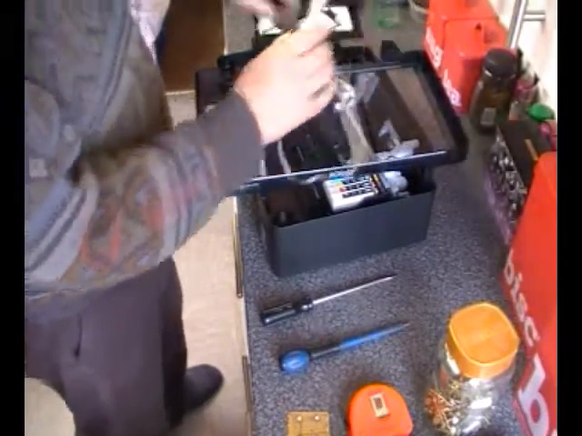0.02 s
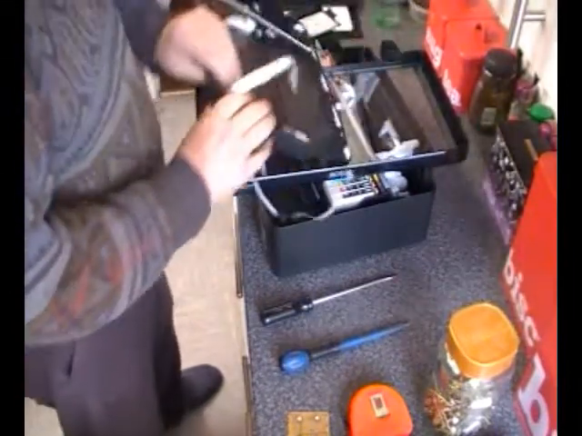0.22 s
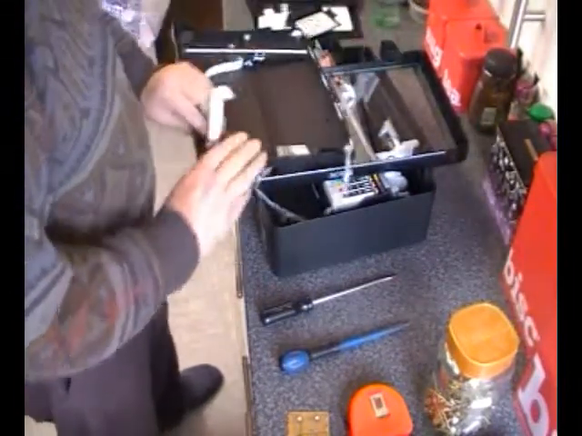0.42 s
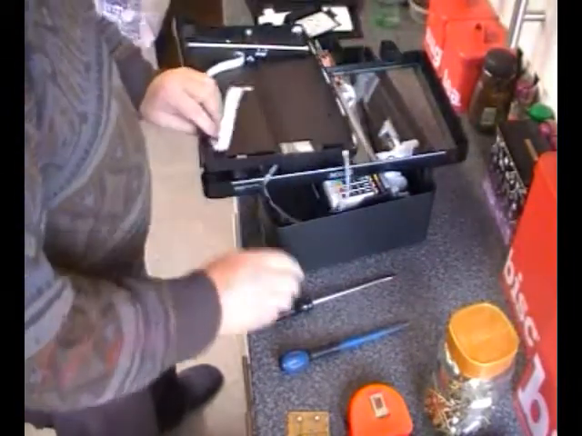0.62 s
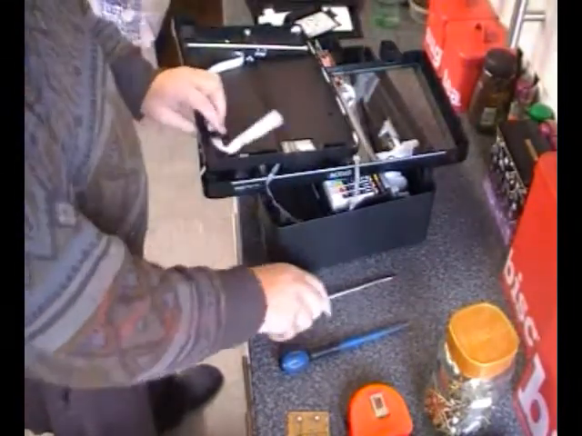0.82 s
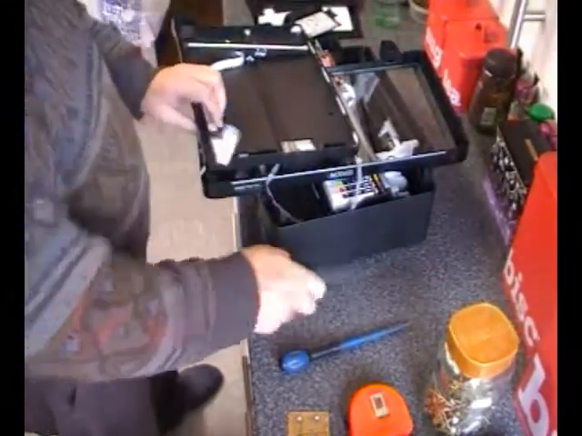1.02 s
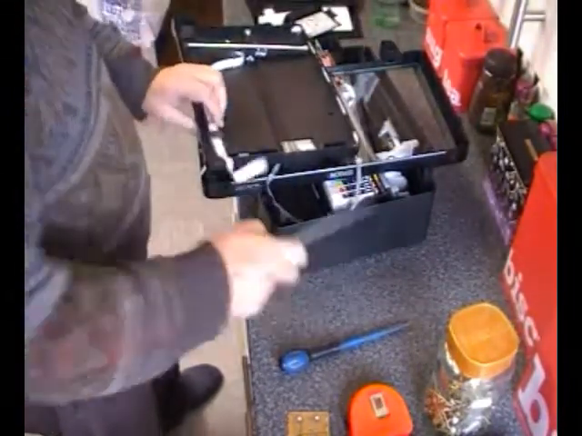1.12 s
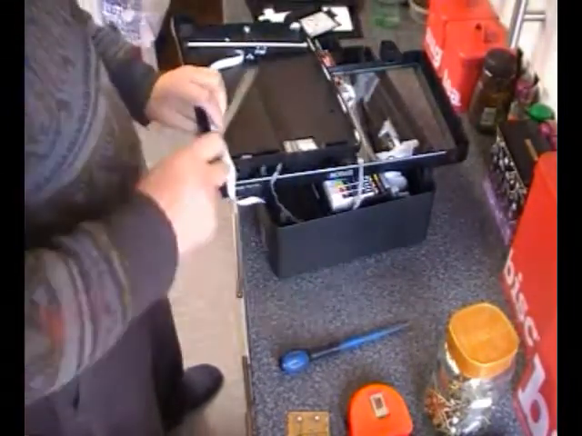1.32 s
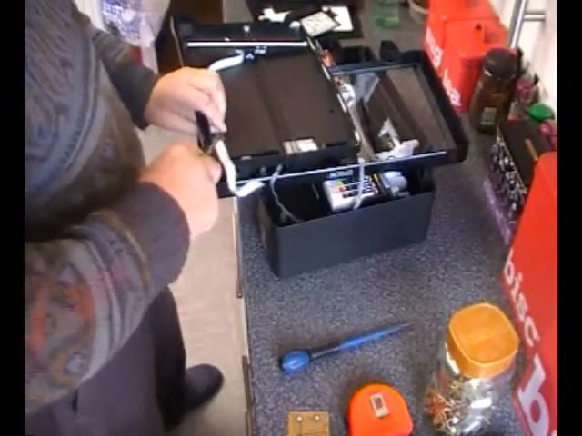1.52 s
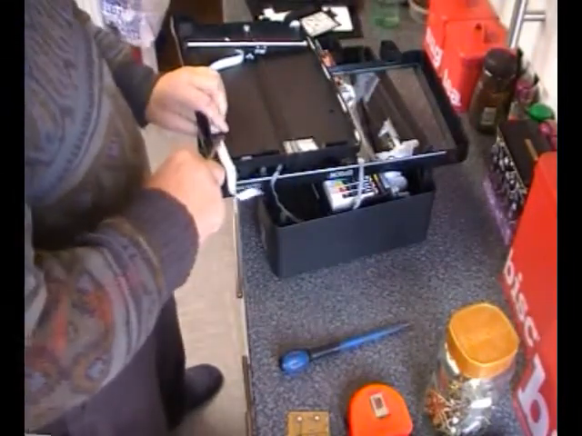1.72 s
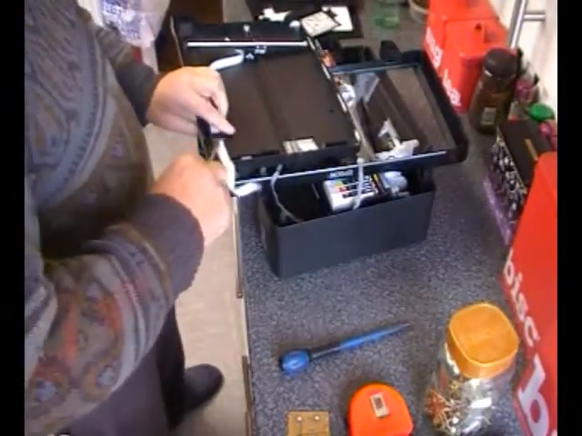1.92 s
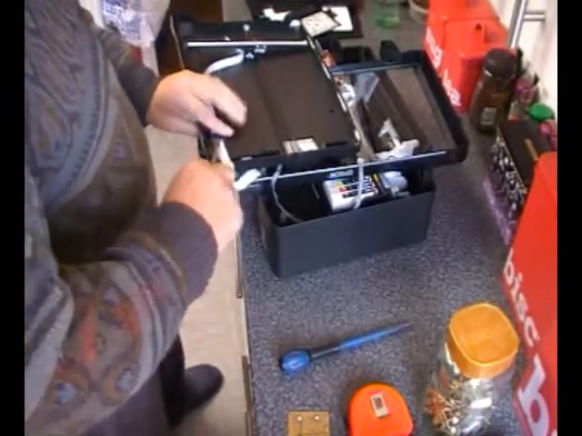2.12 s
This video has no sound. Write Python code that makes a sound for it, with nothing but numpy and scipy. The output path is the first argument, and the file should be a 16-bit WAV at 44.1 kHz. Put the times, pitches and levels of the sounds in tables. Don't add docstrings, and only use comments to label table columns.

```python
import sys
import numpy as np
from scipy import signal
from scipy.fft import rfft, irfft
from scipy.io import wavfile
from scipy.ndimage import uniform_filter1d

SR = 44100
rng = np.random.default_rng(int(sys.argv[2]) if len(sys.argv) > 2 else 0)


def pcm_store(signal):
    levels = np.round(np.clip(np.atleast_2d(signal), -1, 1) * 32767)
    wavfile.write(sys.argv[1], SR, levels.astype(np.int16).T)


def voltage_ratio(decibels):
    exponent = np.asarray(decibels, float) / 20
    return 10 ** exponent


N = 94815

# start in seconds, middle level in dB, low level in dB, high level in dB, contact length in seconds.
CABLE_TICKS = [(.001, -11.5, -41, -32.5, 0.0024), (.013, -20, -50, -41, 0.0023),
               (.030, -19, -46, -23.5, 0.0061), (.045, -24, -40, -40, 0.0046),
               (.069, -21.5, -36, -46, .006), (.094, -30, -47, -40, 0.0048), (.160, -3, -37, -29, 0.0031),
               (.175, -42, -34.5, -29, 0.0044), (.2105, -10, -32, -44, 0.012),
               (.298, -15, -41, -36.5, 0.025), (.3305, -4.5, -28, -23, 0.0073),
               (.3552, 2.5, -20, -21.5, 0.0038), (.338, -14, -33, -33, 0.0012),
               (.368, -8, -25, -38, 0.0055), (.383, -20, -26, -17, 0.0034), (.398, -15, -17, -30, 0.0042),
               (.410, -21, -42, -32, 0.004), (.494, 5.5, -12, -26.5, 0.0064), (.5105, -10, -23, -12, 0.004),
               (.5165, -9.5, -13.5, -16, 0.0042), (.5285, 5.5, -12, -17, .002),
               (.537, -10, -25.5, -19, 0.0025), (.549, -3.5, -30, -35, 0.0031),
               (.562, -27, -20.5, -37, 0.0042), (.5725, 0, -24, -21, 0.0043),
               (.5797, -32, -56, -10.5, 0.0045), (.634, -11.5, -57, -55, 0.0068),
               (.773, -24, -38.5, -43, 0.0043), (.822, -18.5, -36, -23, 0.0064),
               (.838, -15, -40, -38, 0.0072)]
CABLE_DRAGS = [(-.04, -24.5, -41, -35.5, 0.061), (0.047, -34.5, -50.5, -50, 0.18),
               (.225, -28, -46, -49, 0.068), (0.271, -29, -41.5, -45, 0.023), (.315, -29, -38.5, -49, .015),
               (0.338, -15, -34.5, -31, 0.084), (0.442, -22, -42.5, -39.5, 0.059),
               (0.503, -6, -28.5, -20, 0.024), (0.538, -13, -27, -28, 0.022), (0.598, -33, -53, -70, 0.1),
               (.78, -38.5, -53.5, -54, 0.046), (0.851, -36, -45.5, -55, 0.083)]
HANDLE_TICKS = [
    (.948, -33, -31, -55, 0.0055),
    (.970, -34, -38, -37.5, 0.0025),
    (1.007, -17, -65, -27, 0.0042),
    (1.0115, -4.5, -32, -35, 0.0045),
    (1.031, -19, -26, -36, 0.0031),
    (1.040, -12.5, -19.5, -51, 0.0042),
    (1.056, -12, -35, -58, 0.0019),
    (1.148, -28.5, -73, -39, 0.0019),
    (1.175, -23, -37, -44, 0.0021),
]
HANDLE_DRAGS = [
    (0.944, -28, -38.5, -62, 0.049),
    (0.991, -37, -41.5, -45, 0.011),
    (1.018, -25, -38.5, -43.5, 0.0434),
    (1.069, -25.5, -47.5, -72, 0.024),
]
PRY_TICKS = [
    (1.718, -37, -62, -39, 0.0067),
    (1.7225, -6, -20.5, -18.5, 0.0061),
    (1.743, -23, -29, -38, 0.0047),
    (1.762, -14.5, -23, -34, 0.0026),
    (1.8266, -18, -40, -52, 0.0013),
    (1.8578, -37, -42, -26.5, 0.0018),
    (1.861, -12, -27.5, -38, 0.0047),
    (1.877, -20, -40, -61, .003),
    (1.884, -34, -33, -55, 0.0033),
]
PRY_DRAGS = [
    (1.73, -11.5, -31.5, -43, 0.012),
    (1.806, -27, -43.5, -66, 0.041),
    (1.871, -31.5, -46, -70, 0.024),
]
TIP_TICKS = [(1.2509, -19, -39.5, -51, 0.006), (1.2695, -22.5, -40.5, -40, 0.0047),
             (1.3274, -28.5, -64, -46, 0.0064), (1.3623, -23, -49, -46, 0.0043),
             (1.514, -38, -63, -70, 0.0051), (1.6437, -38.5, -45, -49.5, 0.016),
             (1.667, -26.5, -55, -48, 0.0034), (1.997, -32, -38.5, -72, 0.0085),
             (2.0362, -19, -30, -50.5, 0.0064), (2.044, -28, -36, -60, 0.0033),
             (2.051, -28.5, -30, -55, 0.0063), (2.073, -26, -40.5, -55, 0.0033)]
TIP_DRAGS = [
    (1.278, -35, -46, -53, 0.034),
    (1.37, -43.5, -63, -65, 0.049),
    (1.656, -63, -67, -72, 0.045),
    (2.06, -36, -50, -62, 0.03),
]

# frequency in Hz, width in Hz, level in dB.
CASING_MODES = [(217, 53, -19), (259, 17.7, -10), (610, 21, -25), (855, 45, 1), (1110, 36, -8.5),
                (1500, 100, 11), (1800, 44, 6.5), (2850, 140, -2), (3210, 130, -5.5), (4330, 500, -5.5),
                (6650, 220, 6), (8060, 280, 15), (10000, 120, 2), (11300, 380, -3)]
HANDLE_MODES = [(390, 8.8, -5), (503, 28, -27), (844, 98, -1), (1330, 31, 3), (1664, 74, 9), (2250, 40, 3),
                (3020, 140, -4), (3700, 35, -37), (4360, 43, -33), (5900, 210, -13), (8400, 130, -11.5),
                (9120, 170, -14)]
PANEL_MODES = [(542, 48, -2), (834, 36, 3), (1466, 28, 4), (1750, 77, 7), (2090, 60, 3), (3080, 71, -6),
               (3420, 180, -13), (4660, 200, -16), (6480, 130, -11), (7070, 370, -22), (9100, 170, -15),
               (7400, 150, -28)]
TIP_MODES = [(332, 150, -17), (498, 64, 11), (854, 30, -9), (1470, 110, -2.5), (1910, 51, 3),
             (2150, 29, 11), (3220, 39, -4), (7660, 840, -6)]

CASING, HANDLE, PANEL, TIP = range(4)
RING_DB = (-5, 3, 3, -2)
BASS_HZ = (370, 607, 526, 508)
HIGH_HZ = (4690, 3500, 3570, 4200)
DIRECT_DB = (2.07, 0.2, 2.34, 1.5)

# frequency in Hz, time to fall by 60 dB in seconds.
ROOM_T60 = [(300, 0.36), (1000, 0.33), (3000, 0.24), (6000, 0.38), (12000, 0.31)]
# frequency in Hz, level in dB per Hz.
HUM = [(18, -54), (30, -26.5), (390, -5), (502, -2.5), (923, -4.5), (1250, 0.5), (1390, -2), (12000, -17),
       (12900, -18), (16800, -41), (22000, -120)]

LOW_HZ, MID_HZ, TOP_HZ = 1330, 2440, 12560
TICK_RISE_S, DRAG_RISE_S, LOW_LAG_S = .0006, .006, .0013
RELEASE = 0.38
CREST_DB = 16
LEAN = .18
SLIP_SPREAD_DB = 3.5
DRAG_DB, JUDDER_DB, JUDDER_PER_S = 4, 2.5, 150
WIDEN = 2
TREBLE_RING_DB = -4
SOURCE_DB, MIC_HZ = -13.5, 181
ROOM_DB, ROOM_DULL_HZ, ROOM_BUILD_S = .8, 11200, .0015
HUM_DB = -56.5
CEILING, SHEEN_DB = 1.1, -34


def unit(x):
    return x / np.sqrt(np.mean(x ** 2))


def butter(x, hz, kind, order=2):
    return signal.sosfilt(signal.butter(order, hz, kind, fs=SR, output="sos"), x)


def ring(x, hz, width):
    r = np.exp(-np.pi * width / SR)
    poles = [1, -2 * r * np.cos(2 * np.pi * hz / SR), r * r]
    return np.sqrt((1 - r * r) / 2) * signal.lfilter([1, 0, -1], poles, x)


def walk(rate):
    hold = int(SR / rate)
    steps = np.repeat(rng.standard_normal(N), hold)[:N]
    return unit(uniform_filter1d(steps, hold))


def pressure(rows, rise):
    t = np.arange(N) / SR
    out = np.zeros((4, N))
    rises = rise + LOW_LAG_S * np.array([[1], [.5], [.5], [0]])
    for start, mid_db, low_db, high_db, length in rows:
        length = max(length, .001)
        swell = np.clip((t - start + rise) / rises, 0, 1)
        after = np.clip(t - start - length, 0, None)
        shape = swell * np.exp(-after / (RELEASE * min(length, .01)))
        lean_db = LEAN * np.clip(low_db - high_db, -20, 20)
        body_db = mid_db - CREST_DB
        band_db = np.array([low_db, body_db + lean_db, body_db - lean_db, high_db])
        out += (voltage_ratio(band_db)[:, None] * shape) ** 2
    return out


def part(ticks, drags, modes, which):
    bass_hz, high_hz = BASS_HZ[which], HIGH_HZ[which]
    grain = voltage_ratio(SLIP_SPREAD_DB * np.minimum(rng.exponential(size=N), 4))
    judder = voltage_ratio(2 * (DRAG_DB + JUDDER_DB * walk(JUDDER_PER_S)))
    push = np.sqrt(pressure(ticks, TICK_RISE_S) + pressure(drags, DRAG_RISE_S) * judder)
    bands = [(bass_hz, LOW_HZ), (LOW_HZ, MID_HZ), (MID_HZ, high_hz), (high_hz, 15500)]
    out = 0
    for band_push, (lo, hi) in zip(push, bands):
        slips = band_push * unit(grain * rng.standard_normal(N))
        lowest_mode = lo if lo >= LOW_HZ else 0
        inside = [m for m in modes if lowest_mode <= m[0] < hi]
        share = np.sqrt(sum(voltage_ratio(2 * db) * width for _, width, db in inside) + 1e-12)
        rings = 0
        for hz, width, db in inside:
            rings = rings + voltage_ratio(db) * np.sqrt(width) / share * ring(slips, hz, WIDEN * width)
        rattle = butter(slips, [lo, hi], "band", order=3) * np.sqrt(SR / 2 / (min(hi, TOP_HZ) - lo))
        ring_db = RING_DB[which] + TREBLE_RING_DB * (lo == high_hz)
        out = out + rattle + voltage_ratio(ring_db) * rings
    return out


def loose_cable():
    return part(CABLE_TICKS, CABLE_DRAGS, CASING_MODES, CASING)


def lifted_screwdriver():
    return part(HANDLE_TICKS, HANDLE_DRAGS, HANDLE_MODES, HANDLE)


def pried_panel():
    return part(PRY_TICKS, PRY_DRAGS, PANEL_MODES, PANEL)


def searching_tip():
    return part(TIP_TICKS, TIP_DRAGS, TIP_MODES, TIP)


def kitchen(x):
    t = np.arange(SR // 2) / SR
    hz, t60 = np.array(ROOM_T60).T
    tail = 0
    for f in 180 * 2 ** np.arange(0, 6.6, .5):
        band = butter(rng.standard_normal(len(t)), [f / 2 ** 0.25, f * 2 ** 0.34], "band")
        tail = tail + band * voltage_ratio(-60 * t / np.interp(np.log(f), np.log(hz), t60))
    build = 1 - np.exp(-t / ROOM_BUILD_S)
    tail = butter(tail * build, ROOM_DULL_HZ, "low", order=1)
    return voltage_ratio(ROOM_DB) * signal.fftconvolve(x, tail / np.sqrt(np.sum(tail ** 2)))[:N]


def hum():
    f = np.fft.rfftfreq(N, 1 / SR) + 1
    hz, db = np.array(HUM).T
    colour = voltage_ratio(np.interp(np.log(f), np.log(hz), db))
    return voltage_ratio(HUM_DB) * unit(irfft(rfft(rng.standard_normal(N)) * colour, N))


def scene():
    parts = np.array([loose_cable(), lifted_screwdriver(), pried_panel(), searching_tip()])
    parts = voltage_ratio(SOURCE_DB) * butter(parts, MIC_HZ, "high")
    direct = voltage_ratio(np.array(DIRECT_DB)) @ parts
    reflected = sum(kitchen(p) for p in parts)
    return (direct + reflected + hum())[None]


def band_limit(x):
    return signal.sosfilt(signal.butter(12, 15784, fs=SR, output="sos"), x)


def record(dry):
    soft = CEILING * np.tanh(dry / CEILING)
    steep = signal.ellip(10, .3, 60, TOP_HZ, fs=SR, output="sos")
    sheen = voltage_ratio(SHEEN_DB) * butter(soft, 11300, "high", order=8)
    mix = signal.sosfilt(steep, soft) + sheen
    return band_limit(mix)


dry = scene()
out = record(dry)
pcm_store(out)
```